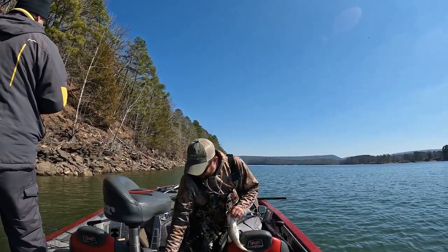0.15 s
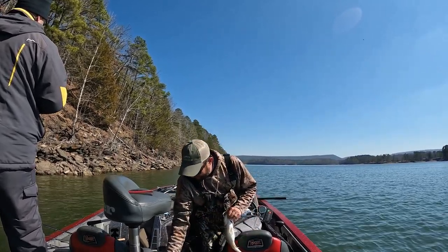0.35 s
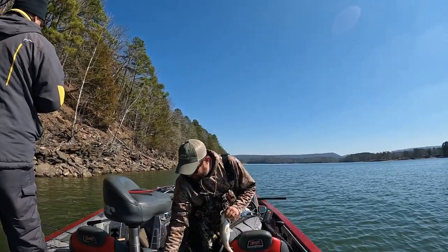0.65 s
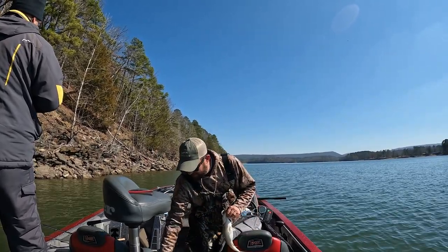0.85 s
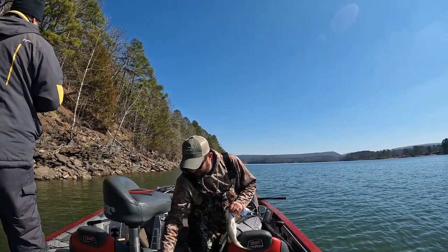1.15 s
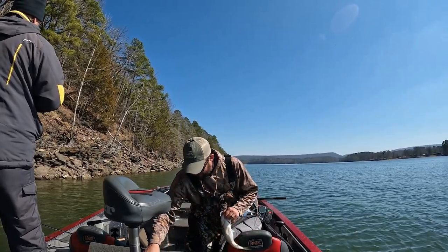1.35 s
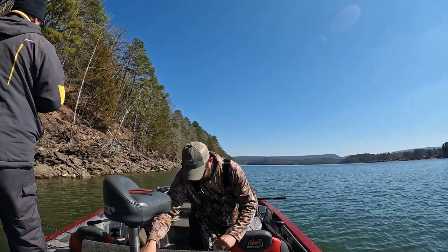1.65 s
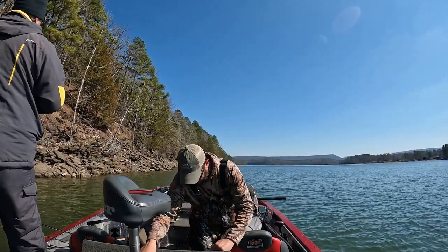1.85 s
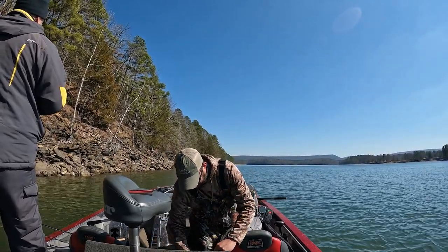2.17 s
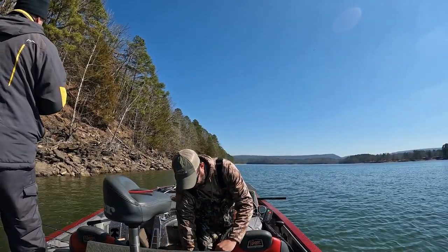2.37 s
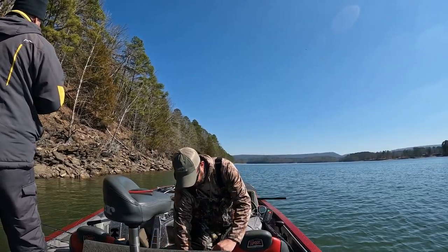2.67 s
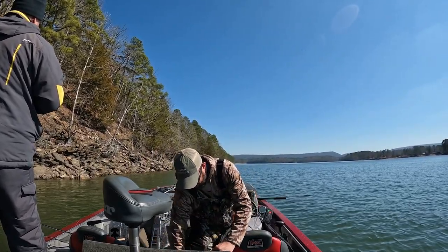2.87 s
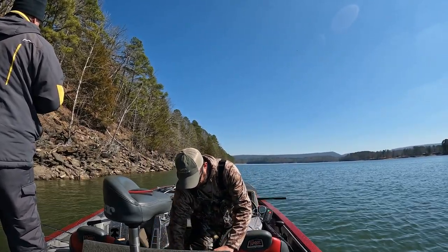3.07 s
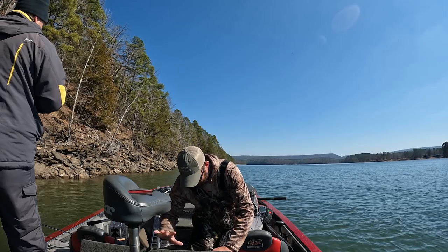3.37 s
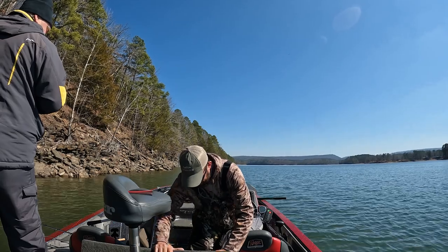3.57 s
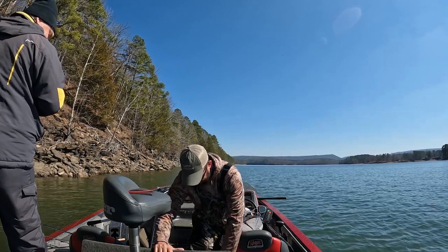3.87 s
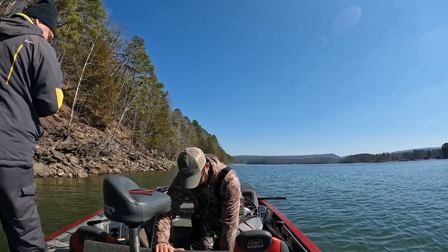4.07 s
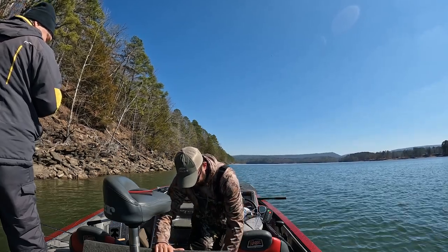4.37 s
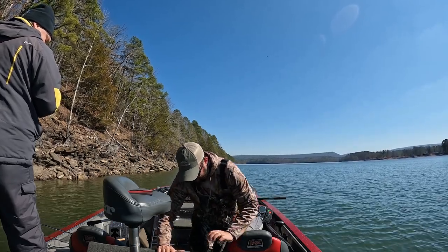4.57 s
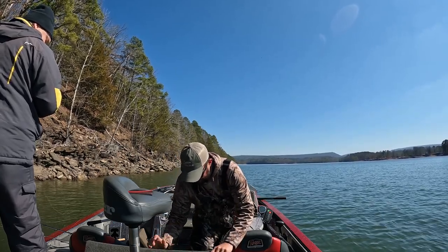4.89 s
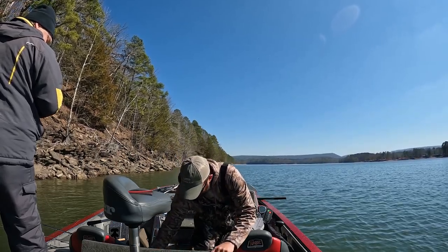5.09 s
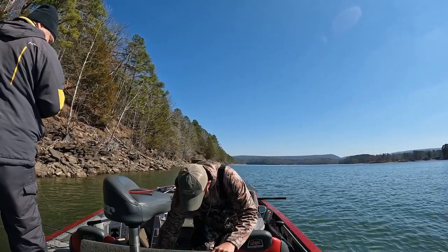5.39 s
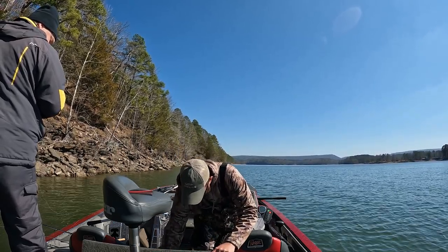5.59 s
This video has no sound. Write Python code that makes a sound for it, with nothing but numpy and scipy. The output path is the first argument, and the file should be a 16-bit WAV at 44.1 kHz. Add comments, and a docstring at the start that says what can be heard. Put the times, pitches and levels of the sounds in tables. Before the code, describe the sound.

Close, dry handling sounds come from a small boat in open air, over faint lapping water, a low hull murmur and uneven wind rumble on the microphone. At about 0.7 seconds a quick cluster of hollow deck knocks lands with a dull thump and small tackle ticks. Lighter bumps and a faint carpet scuff follow between 1 and 2.2 seconds. From 2.5 to 2.9 seconds a locker lid clatters loudly, leaving a low hum for about half a second and a soft scuff. Deep, soft thumps bump the hull from 3.1 to 4 seconds. Light ticks and faint drips are scattered from about 3.7 to 5 seconds, with a sharper knock and thump near 4.6. Around 5.4 seconds comes another loud clatter of the lid, with a brief low hum, a scuff and a slight swell of water.

```python
"""Handling a fish in a small boat

On a calm lake someone kneels, handles a fish and works the lid of a deck locker. Knocks and carpet
scuffs ring the hollow deck, soft blows thump the hull, the lid hums. Tackle ticks, drips ring as
small air pockets and water laps. Wind and hull motion rumble in the microphones."""
import sys
import numpy as np
from scipy import signal
from scipy.fft import rfft, irfft
from scipy.io import wavfile
from scipy.ndimage import uniform_filter1d

SR = 44100
rng = np.random.default_rng(int(sys.argv[2]) if len(sys.argv) > 2 else 0)


def unload_wav(signal):
    """Save mono or channel-first audio to the path in sys.argv[1] as 16-bit WAV at rate SR, clipped to [-1, 1]."""
    wavfile.write(
        sys.argv[1],
        SR,
        np.round(np.clip(np.atleast_2d(signal).T, -1, 1) * 32767).astype(np.int16),
    )


N = 253134

# deck knocks: (time [s], level [dB], hardness [dB/octave], low-mode weight [dB], contact t60 [s])
DECK_KNOCKS = [(0.302, -46.5, 3, -27, 0.12), (0.362, -45, 3, -2.5, 0.07), (0.699, -34.5, -3, -2, 0.05),
               (0.704, -27.5, -4, -8.5, 0.14), (0.716, -25.5, -1, 1.5, 0.09),
               (0.731, -22.5, 0, -1.5, 0.094), (0.748, -22, -2.5, -1, 0.032), (0.826, -41, -4.5, -3.5, 0.1),
               (0.932, -39, 2, -1, 0.075), (0.966, -36, -3, -13.5, 0.086), (1.44, -37.5, 3, 4.5, 0.3),
               (1.503, -30, -5, 2.5, 0.082), (1.54, -50, -4, 3, 0.16), (2.078, -33, -10, 10, 0.1),
               (2.103, -36, 1.5, 2, 0.11), (2.182, -49, 4.5, -36, 0.06), (2.516, -30, 4, -7, 0.092),
               (2.607, -26, 3, 3, 0.13), (2.644, -15, -1.1, 1, 0.06), (2.659, -14.5, -0.1, 1.5, 0.091),
               (2.676, -25, 1.5, -1, 0.15), (2.696, -19, -0.5, 4, 0.061), (2.72, -26, 5, 11, 0.26),
               (2.834, -29, -13, 0, 0.31), (3.072, -28.5, 2.2, 5, 0.11), (3.168, -44, -5, 18, 0.19),
               (3.3, -43.5, -4, 18, 0.039), (3.401, -42.5, 7, 10, 0.18), (3.681, -40.5, 1.5, -14, 0.048),
               (4.262, -41, -1.5, -28, 0.3), (4.613, -34.5, 8, -1, 0.13), (4.653, -25, 7, 3.5, 0.12),
               (4.739, -37, 10.5, 8.5, 0.063), (5.14, -45.5, 3, -0.5, 0.16), (5.361, -29, 2, -4.5, 0.21),
               (5.447, -13.5, -4, -7, 0.05), (5.455, -14.5, 4.5, 7.5, 0.039), (5.466, -25.5, 4, -4, 0.13),
               (5.479, -19, 2.5, -1.5, 0.062), (5.503, -31, 5.5, -1, 0.06), (5.528, -20, 2, 1, 0.073),
               (5.584, -29, 7, 7, 0.16), (5.608, -28, -8, -5, 0.18)]


def gain_of(db):
    """dB to gain."""
    return 10 ** (np.asarray(db) / 20)


def unit_rms(x):
    """Scales to rms 1."""
    return x / np.sqrt(np.mean(x ** 2) + 1e-20)


def smooth(x, size):
    """Moving average over size points."""
    return uniform_filter1d(x, size=size)


def at_hz(points, hz):
    """Interpolates (frequency, value) points on a log axis."""
    f, value = np.transpose(points)
    return np.interp(np.log(hz + 1), np.log(f + 1), value)


def envelope(rows, column=1):
    """Gain per sample from a table's dB column."""
    rows = np.array(rows)
    return gain_of(np.interp(np.arange(N) / SR, rows[:, 0], rows[:, column], -120, -120))


def add(mix, start_s, sound):
    """Mixes a sound in at start_s."""
    part = mix[..., round(start_s * SR):][..., :sound.shape[-1]]
    part += sound[..., :part.shape[-1]]


def noise(colour, likeness, patchy_db, flicker_db, size=512):
    """Stereo noise with drifting patches and wide-band flicker; likeness(hz) is L/R correlation."""
    frames, hz = 4 * N // size + 5, np.fft.rfftfreq(size, 1 / SR)
    a, b, c, d, patches = rng.standard_normal((frames, len(hz), 5)).T
    patches = unit_rms(smooth(uniform_filter1d(patches, size=7, axis=0), 8))
    flicker = unit_rms(smooth(rng.standard_normal(frames), 3))
    same = np.clip(likeness(hz), -1, 1)[:, None]
    left = a + 1j * b
    right = same * left + np.sqrt(1 - same ** 2) * (c + 1j * d)
    level_db = at_hz(colour, hz)[:, None] + patchy_db * patches + flicker_db * flicker
    spectra = np.array([left, right]) * gain_of(level_db)
    return unit_rms(signal.istft(spectra, nperseg=size, noverlap=3 * size // 4)[1][:, :N])


def ring(hz, rise_s, t60_s, glide_per_s=0.):
    """Damped sine of peak 1 with optional upward glide."""
    t = np.arange(round((rise_s + t60_s) * SR) + 2) / SR
    attack = np.sin(np.pi / 2 * np.minimum(t / rise_s, 1)) ** 2
    decay = gain_of(-60 * np.maximum(t - rise_s, 0) / t60_s)
    return attack * decay * np.sin(2 * np.pi * hz * (t + glide_per_s * t ** 2))


def resonance(hz, centre_hz, width_hz):
    """Complex response of one mode."""
    return 1 / (1 + 2j * (hz - centre_hz) / width_hz)


def deck_response(hz):
    """Modes of the hollow deck, which carries no treble."""
    # deck modes: (frequency [Hz], width [Hz], level [dB])
    modes = [(233, 54, -4), (315, 15.5, -1), (392, 94, -6.5), (506.8, 30, -4), (672, 98, -17.5),
             (861.5, 15, -13.5), (1066, 58, -9.5), (1064, 38.4, -6), (1687, 143, -17.5), (1703, 130, -16.5)]
    total = sum((-1) ** k * gain_of(db) * resonance(hz, f, width_hz)
                for k, (f, width_hz, db) in enumerate(modes))
    return total / (1 + 1j * hz / 2500) ** 3


def knocks():
    """A chattering contact drives the deck modes and cracks in the air; harder blows are brighter."""
    # contact crack spectrum: (frequency [Hz], density [dB])
    crack = [(120, 16.5), (200, 8.5), (405, -5.5), (833, -8), (1150, -7), (1430, -12.5), (7550, -44),
             (11600, -56), (15000, -79)]
    size, lead_samples, out = 16384, 441, np.zeros((2, N))
    t, hz = np.arange(size) / SR, np.fft.rfftfreq(size, 1 / SR)
    response = deck_response(hz) + gain_of(at_hz(crack, hz) - 6.5)
    low_cut = (1j * hz / (1j * hz + 170)) ** 2  # a small contact moves little bass
    for start_s, db, hardness_db, weight_db, t60_s in DECK_KNOCKS:
        a, b, c = rng.standard_normal((3, size))
        chatter = gain_of(1.6 * unit_rms(smooth(c, 130)))
        hold = gain_of(-60 * (t / t60_s) ** 1.4)
        first_touch = 0.8 * gain_of(-60 * t / 0.0052)
        shape = np.minimum(t / 0.0029, 1) * (hold + first_touch)
        contact = np.array([a, 0.9 * a + 0.18 * b]) * chatter * shape
        # struck spot: near 526 Hz for weighty knocks; negative, so no peak, for light ones
        spot_hz = 526 + 484 / (np.exp((weight_db + 1) / 0.55) - 0.5)
        spot = 1 + 1.13 * resonance(hz, spot_hz, 0.13 * spot_hz)
        tilt_db = hardness_db * np.log2(np.clip(hz / 1100, 1, 6)) + weight_db / (1 + (hz / 650) ** 4)
        knock = irfft(rfft(contact) * response * spot * gain_of(tilt_db) * low_cut)
        knock = np.roll(knock, lead_samples, axis=1)[:, :size // 2]  # keeps the onset smooth
        nominal_peak = np.sqrt(3.15 * smooth(knock[0] ** 2, 600).max())
        add(out, start_s - lead_samples / SR, gain_of(db) * knock / nominal_peak)
    return out


def thumps():
    """Each soft blow bounces the hull at one low pitch, unevenly, with a dull slap."""
    # heavy blows: (time [s], level [dB], pitch [Hz], t60 [s])
    blows = [(0.721, -19, 78.5, 0.13), (0.751, -22, 96, 0.067), (0.965, -38, 194.4, 0.12),
             (1.315, -27, 89.2, 0.25), (1.496, -33.5, 211.3, 0.27), (2.09, -22.5, 191, 0.11),
             (2.178, -34, 91, 0.12), (2.526, -30.5, 167.3, 0.31), (2.612, -22.5, 97.7, 0.28),
             (2.656, -17.5, 146, 0.22), (2.692, -11.5, 125, 0.068), (2.866, -21, 118, 0.13),
             (3.133, -25, 72.7, 0.31), (3.293, -40, 73, 0.18), (3.476, -27, 59.6, 0.08),
             (3.498, -18.5, 77, 0.055), (3.602, -23.5, 64.6, 0.32), (3.626, -15.5, 149, 0.15),
             (4.025, -23.5, 67, 0.088), (4.616, -26.5, 140.1, 1), (4.662, -13.5, 130.4, 0.04),
             (4.669, -22.5, 337, 0.18), (4.823, -20, 126.6, 0.11), (5.369, -32, 125.7, 0.34),
             (5.457, -36, 103, 0.1), (5.484, -15, 154, 0.076), (5.535, -22.5, 118, 0.16)]
    rise_s, slap_db = 0.01, -22
    out, t = np.zeros(N), np.arange(SR // 2) / SR
    for start_s, db, hz, t60_s in blows:
        tone = ring(hz, rise_s, t60_s)[:len(t)]
        a, b = rng.standard_normal((2, len(t)))
        uneven = 1 + 0.2 * unit_rms(smooth(smooth(a, 300), 300))
        slap = unit_rms(signal.lfilter(*signal.butter(2, [hz, 3.12 * hz], "band", fs=SR), b))
        slap *= gain_of(slap_db - 60 * t / t60_s) * np.minimum(t / rise_s, 1)
        add(out, start_s - 0.004, gain_of(db) * (tone * uneven[:len(tone)] + slap[:len(tone)]))
    return out


def lid_hum():
    """The lid's lowest mode wobbles in pitch and fades slowly until a hand damps it."""
    # lid hums: (start [s], length [s], pitch [Hz], level [dB])
    hums = [(2.643, 0.442, 111.3, -25), (5.452, 0.28, 111.6, -23.5)]
    rise_s, damp_s, fade_db_per_s = 0.013, 0.052, 11.5
    out = np.zeros(N)
    for start_s, length_s, hz, db in hums:
        t = np.arange(0, length_s, 1 / SR)
        wobble = unit_rms(smooth(smooth(rng.standard_normal(SR), 900), 900))
        cycles = np.cumsum(hz * (1 + 0.011 * wobble[:len(t)])) / SR
        gate = np.minimum(t / rise_s, 1) * np.minimum((length_s - t) / damp_s, 1)
        add(out, start_s, gate * gain_of(db - fade_db_per_s * t) * np.sin(2 * np.pi * cycles))
    return out


def scuffs():
    """Carpet hiss swells and fades under a stroke whose pressure also stirs the deck modes."""
    # strokes: (start [s], length [s], swell share [0-1], peak [dB], deck re hiss [dB])
    strokes = [(1.145, 0.27, 0.35, -48.5, -2.5), (2.694, 0.43, 0.65, -48.5, -13),
               (5.529, 0.25, 0.33, -46.5, 5.5)]
    # carpet hiss spectrum: (frequency [Hz], density [dB])
    colour = [(410, -1), (700, 3.5), (928, 1), (1000, 3), (1530, 1), (4000, -5), (7800, -12), (12700, -25),
              (15000, -40)]
    hiss = noise(colour, lambda hz: 0.93 - hz / 40000, patchy_db=0.8, flicker_db=0.8)
    response = deck_response(np.fft.rfftfreq(N, 1 / SR))
    deck = unit_rms(irfft(rfft(rng.standard_normal(N)) * response, N))
    out, t = np.zeros((2, N)), np.arange(N) / SR
    for start_s, length_s, swell, db, deck_db in strokes:
        progress = np.interp(t - start_s, [0, swell * length_s, length_s], [0, 0.5, 1])
        arch = abs(np.sin(np.pi * progress)) ** 1.11
        out += gain_of(db) * arch * (hiss + gain_of(deck_db) * deck)
    return out


def tackle_ticks():
    """Tackle and zip: a dry snap through a broad resonance, with a thin treble edge."""
    # ticks: (time [s], peak before panning [dB], pitch [Hz], edge peak before panning [dB])
    ticks = [(0.04, -47, 3350, -67), (0.719, -36, 7000, -65), (0.7358, -33.5, 7300, -61),
             (0.751, -43, 6600, -58), (0.9246, -50, 6310, -75), (1.0813, -52, 3800, -66),
             (1.5084, -43, 6600, -82), (1.711, -45, 5300, -74), (2.0966, -45, 5550, -69),
             (2.1306, -38.5, 6000, -63), (2.175, -53, 3430, -59), (2.4104, -59, 3680, -65),
             (2.4537, -35, 4700, -64), (2.518, -35.5, 3620, -74), (2.6816, -35, 3600, -77),
             (2.8247, -41, 3560, -70), (3.671, -37.5, 5700, -65), (3.7516, -49, 4570, -53.5),
             (4.0023, -45, 4910, -73), (4.1335, -43, 5070, -69), (4.203, -40.5, 4960, -66),
             (4.2425, -45, 4420, -68), (4.2948, -41.5, 4850, -54), (4.319, -44, 6700, -65),
             (4.517, -53, 3760, -68), (4.657, -30, 5200, -63), (4.6705, -35.5, 3440, -59),
             (4.7242, -43, 3500, -72), (4.7426, -43, 6700, -74), (4.826, -45, 5500, -61),
             (4.8487, -46, 3800, -66), (5.3675, -38.5, 3930, -63), (5.4151, -48, 3850, -60),
             (5.4844, -43, 3760, -70)]
    edge_hz, edge_pan_db = 12300, np.array([[9], [-3]])
    size, out = 1024, np.zeros((2, N))
    t, hz = np.arange(size) / SR, np.fft.rfftfreq(size, 1 / SR)
    shapes = np.minimum(t / 0.00086, 1) * gain_of(-60 * t / [[0.018], [0.03]])  # body, edge
    for start_s, db, pitch_hz, edge_db in ticks:
        body_snap, edge_snap = rfft(rng.standard_normal((2, size)) * shapes)
        body = irfft(body_snap * resonance(hz, pitch_hz, 0.42 * pitch_hz) ** 2)
        edge = irfft(edge_snap * resonance(hz, edge_hz, 1800) ** 2)
        pan_db = 0.22 * (-26.5 - db) * np.array([[0.5], [-0.5]])  # softer ticks sit further left
        add(out, start_s, gain_of(db + pan_db) * body / abs(body).max())
        add(out, start_s, gain_of(edge_db + edge_pan_db) * edge / abs(edge).max())
    return out


def drips():
    """A small air pocket rings unevenly and rises in pitch."""
    # drips and plinks: (time [s], level [dB], pitch [Hz])
    plinks = [(0.102, -51.5, 1400), (0.129, -50.5, 2300), (0.472, -50.5, 1330), (1.588, -49, 1534),
              (1.646, -53, 1205), (2.436, -50, 1164), (3.767, -45, 1050), (3.924, -48.5, 1530),
              (4.348, -42, 1003), (4.704, -45, 726), (4.725, -44, 555), (4.798, -40.5, 1206),
              (4.874, -45.5, 1880), (4.903, -47, 815), (4.954, -49, 567)]
    out = np.zeros(N)
    for start_s, db, hz in plinks:
        tone = ring(hz, rise_s=0.0027, t60_s=0.06, glide_per_s=1)
        flutter = 1 + 0.68 * unit_rms(smooth(rng.standard_normal(8000), 160))
        add(out, start_s, gain_of(db) * tone * flutter[:len(tone)])
    return out


def lapping():
    """A patchy wash of water, with tiny bubbles popping and wet cloth crackling in it."""
    # water and cloth: (time [s], wash level [dB], rustle level [dB])
    levels = [(0.0, -58.5, -73), (0.48, -65, -75), (0.7, -66, -70.5), (0.87, -66.5, -80), (1.0, -63.5, -75),
              (1.41, -61.5, -74.5), (1.71, -62, -69), (2.45, -62, -72.5), (2.8, -57.5, -73),
              (3.42, -64.5, -75.5), (4.27, -56, -69.5), (5.18, -59.5, -75), (5.6, -51, -62.5),
              (5.74, -63, -85)]
    # wash spectrum: (frequency [Hz], density [dB])
    wash_colour = [(260, -29), (450, -2.5), (503, -21), (583, -4), (792, -12), (907, -5), (1700, -3),
                   (2460, -9), (5740, -14), (8500, -23), (11000, -60), (18700, -120)]
    # wash stereo likeness: (frequency [Hz], correlation [0-1])
    likeness = [(60, 0.97), (180, 0.3), (540, 0.14), (1620, 0.36), (4850, 0.49), (14600, 1)]
    # cloth rustle spectrum: (frequency [Hz], density [dB])
    rustle_colour = [(4410, -21), (7500, -8.5), (12200, -14.5), (14500, -22)]
    pops_per_s, crackles_per_s, crackle_t60_s = 20, 45, 0.0089  # pop rate is per pitch
    wash = noise(wash_colour, lambda hz: at_hz(likeness, hz), patchy_db=3, flicker_db=1)
    pops = np.zeros(N)
    for hz in np.geomspace(950, 5000, num=16):
        sizes = gain_of(4.5 * np.minimum(rng.exponential(1, N), 3))
        births = rng.random(N) < pops_per_s / SR
        bubble = ring(hz, rise_s=1.37 / hz, t60_s=13 / hz, glide_per_s=18)
        pops += signal.oaconvolve(sizes * births, bubble)[:N] / hz
    impulses = rng.uniform(0.13, 1, N) * (rng.random(N) < crackles_per_s / SR)
    crackle = 1 + signal.oaconvolve(impulses, gain_of(-60 * np.arange(900) / SR / crackle_t60_s))[:N]
    rustle = noise(rustle_colour, lambda hz: 0.47 + hz / 90000, patchy_db=2.5, flicker_db=1)
    water = wash * crackle + gain_of(-5) * unit_rms(pops)
    return envelope(levels) * water + envelope(levels, column=2) * rustle * crackle


def hull_murmur():
    """Low, uneven noise from the whole hull; each knock stirs it up for a while."""
    # hull spectrum: (frequency [Hz], density [dB])
    colour = [(47, -48), (80, -6.5), (183, -1.5), (231, -7), (371, -20), (600, -32), (780, -71),
              (1320, -120)]
    rest_db, stir_db, rise_s, t60_s = -54, -23.5, 0.061, 1.97
    power, t = np.full(N, gain_of(rest_db) ** 2), np.arange(SR) / SR
    for start_s, knock_db, *_ in DECK_KNOCKS:
        stir = gain_of(knock_db + stir_db - 60 * t / t60_s) * np.minimum(t / rise_s, 1)
        add(power, start_s, stir ** 2)
    murmur = noise(colour, lambda hz: 0.79 + hz / 9000, patchy_db=2, flicker_db=5.5, size=1024)
    return np.sqrt(power) * murmur


def wind_rumble():
    """Lumpy low pressure, partly unlike at the two microphones."""
    # gusts: (time [s], level [dB])
    gusts = [(0.0, -58), (0.37, -35), (0.45, -47), (0.77, -35), (0.83, -55.5), (1.31, -34), (1.4, -43),
             (2.8, -31), (3.08, -52), (3.15, -29.5), (3.42, -41.5), (3.63, -29.5), (3.7, -39.5),
             (3.87, -35.5), (4.6, -41.5), (5.1, -41), (5.68, -30), (5.74, -61)]
    # wind spectrum: (frequency [Hz], density [dB])
    colour = [(8.8, -10), (15, -2), (40, 0), (70, -12), (110, -10), (140, -52), (240, -120)]
    lumps = noise(colour, lambda hz: 0.76 + hz / 900, patchy_db=4, flicker_db=1, size=2048)
    local_rms = np.sqrt(smooth(lumps.mean(0) ** 2, 5000) + 0.011)
    return envelope(gusts) * unit_rms(lumps / local_rms)


def scene():
    """Everything aboard, in open air without reverberation."""
    handling = knocks() + thumps() + lid_hum() + scuffs() + tackle_ticks()
    return handling + drips() + lapping() + hull_murmur() + wind_rumble()


def record(dry):
    """The microphone pair dulls the top, leans left in the treble, right in the bass; 15 kHz limit."""
    # microphone response: (frequency [Hz], gain [dB])
    response = [(7400, -0.5), (8200, -4.5), (11000, 0), (12500, -1), (14600, -4)]
    # channel balance: (frequency [Hz], left minus right [dB])
    balance = [(60, -4.5), (180, -1.5), (540, -0.5), (1620, 2.5), (4850, 1.5), (14600, 5)]
    hz = np.fft.rfftfreq(N, 1 / SR)
    lean_db = at_hz(balance, hz)
    coloured = irfft(rfft(dry) * gain_of(at_hz(response, hz) + [lean_db / 2, -lean_db / 2]), N)
    low_pass = signal.firwin(1023, 15000, window=("kaiser", 9), fs=SR)
    return signal.oaconvolve(coloured, low_pass[None], "same")


dry = scene()
out = record(dry)
unload_wav(out)
```